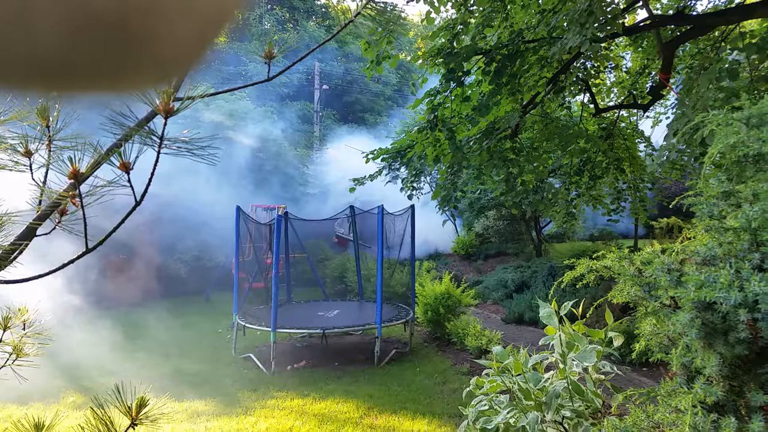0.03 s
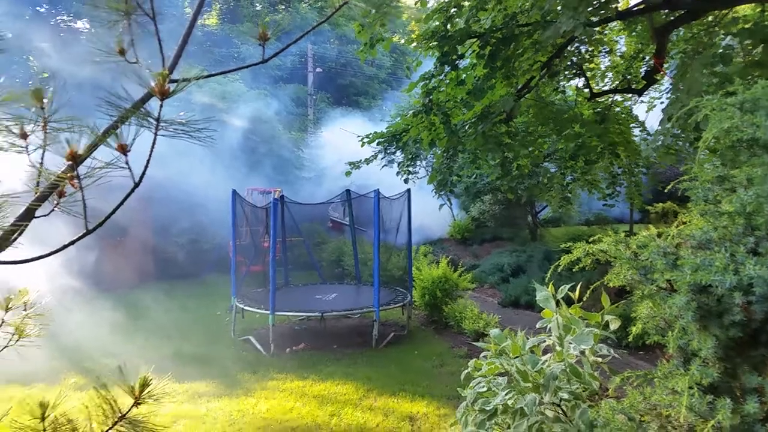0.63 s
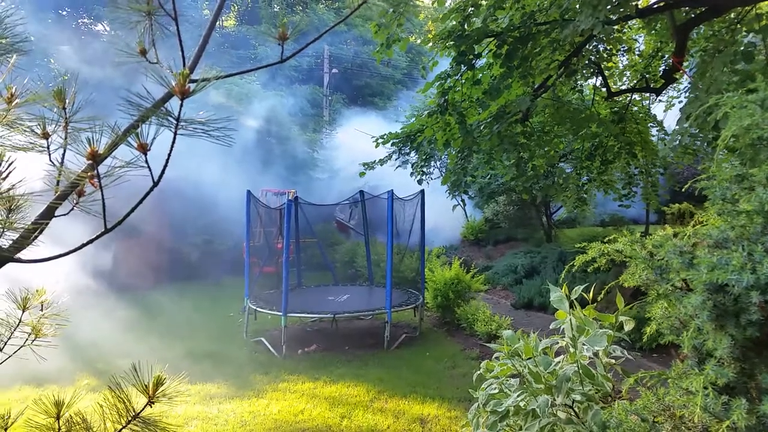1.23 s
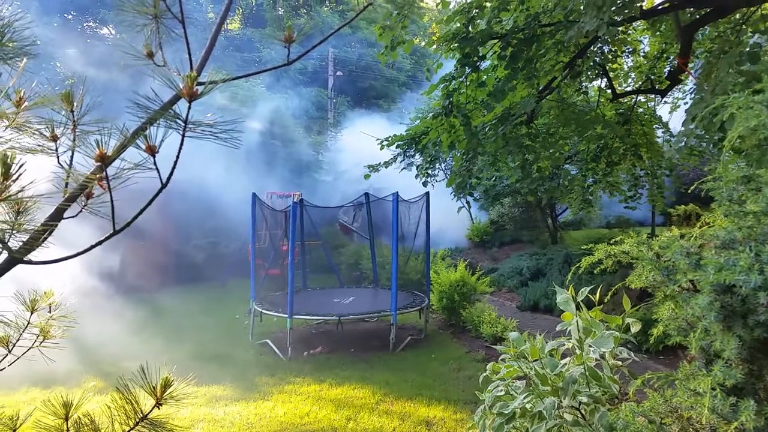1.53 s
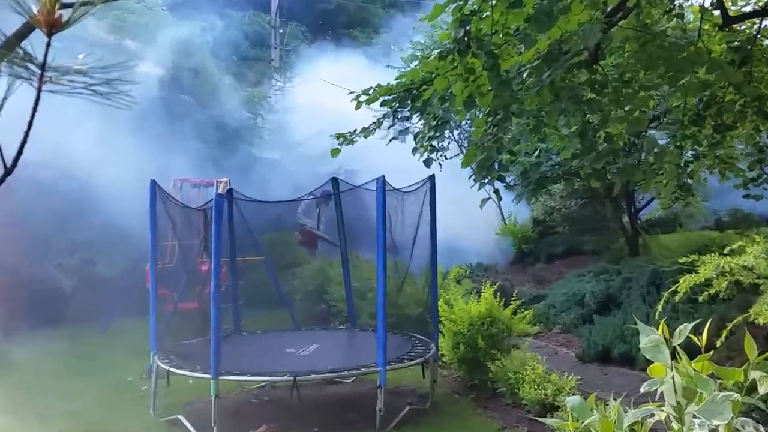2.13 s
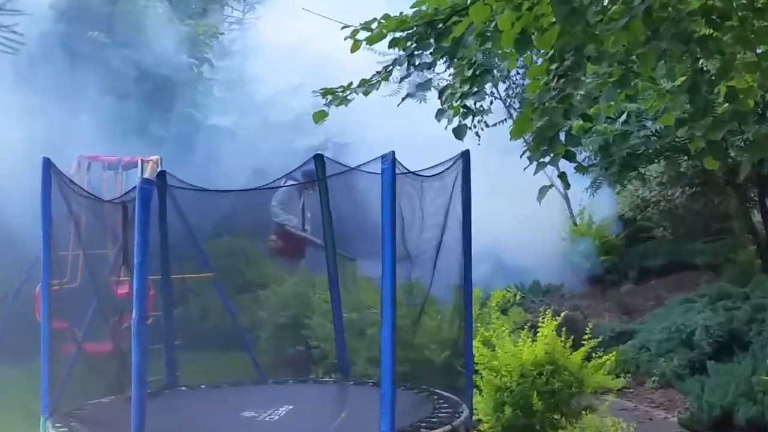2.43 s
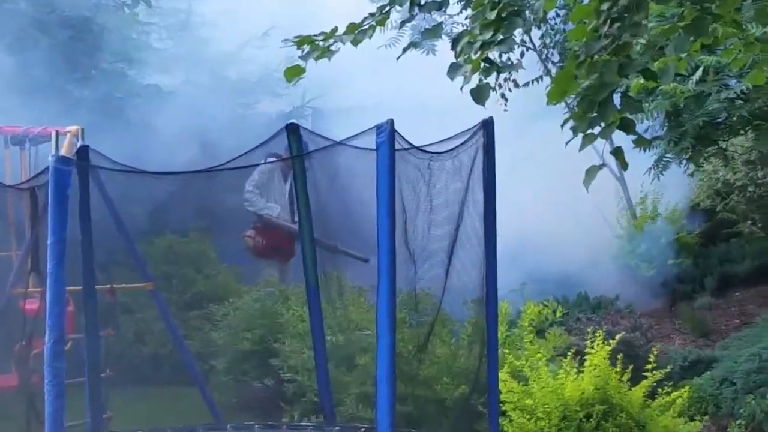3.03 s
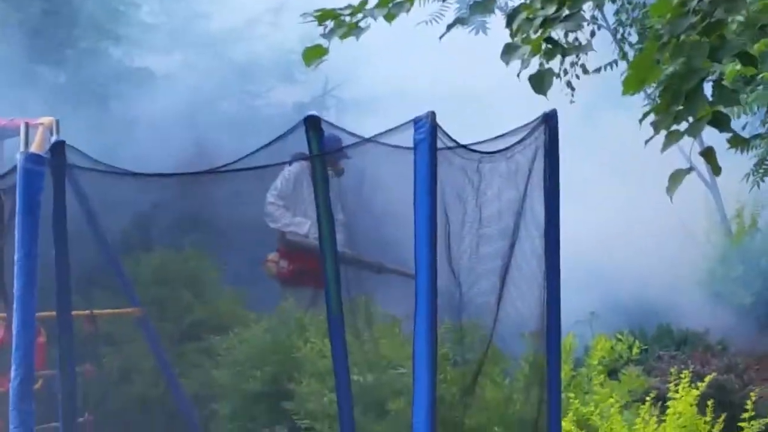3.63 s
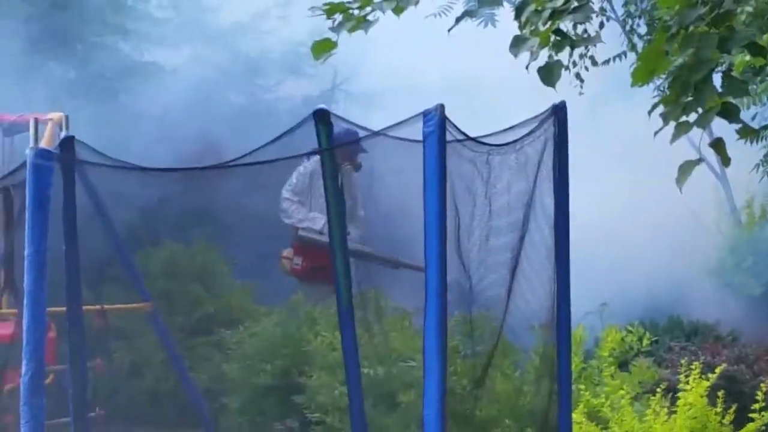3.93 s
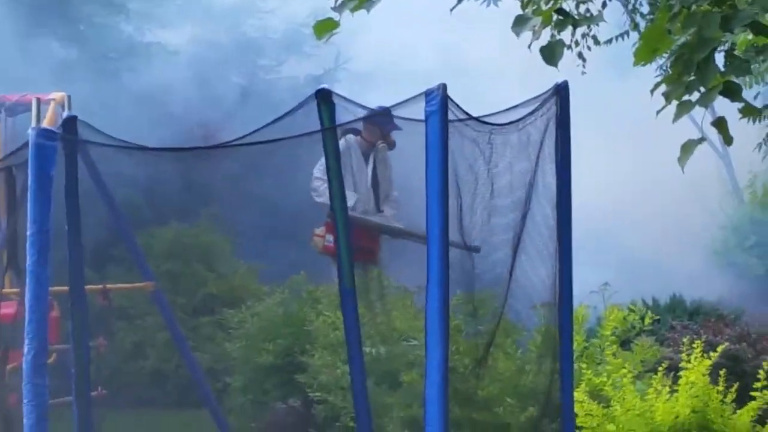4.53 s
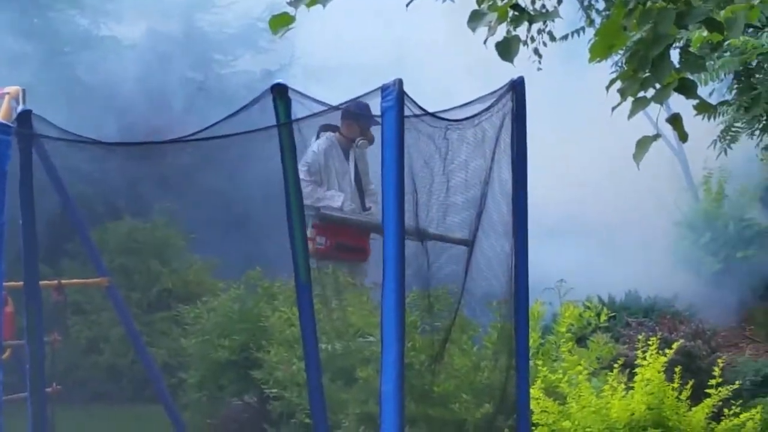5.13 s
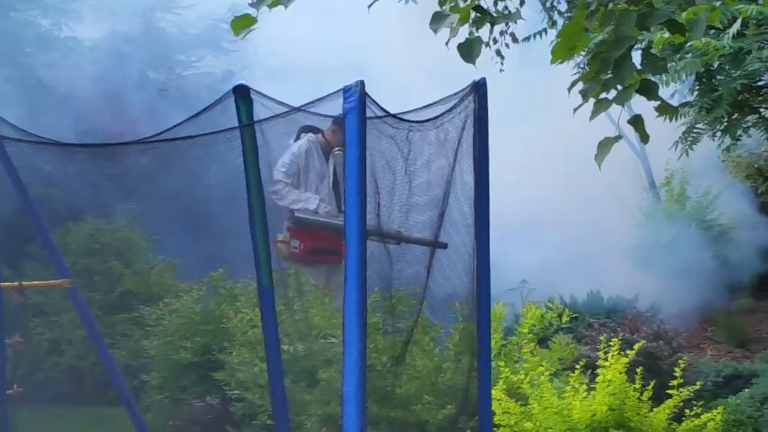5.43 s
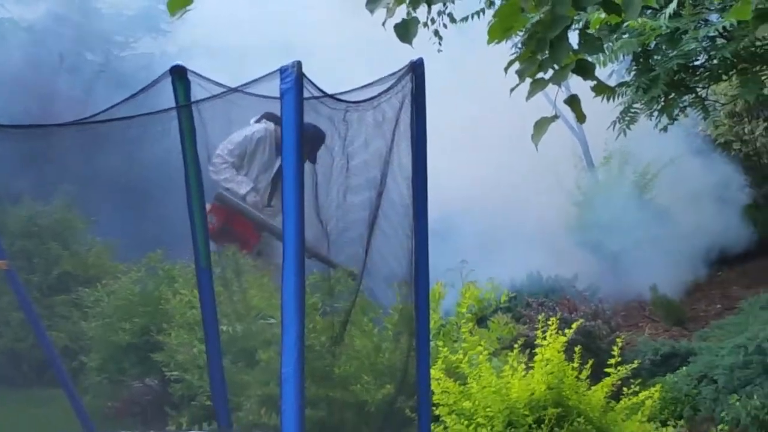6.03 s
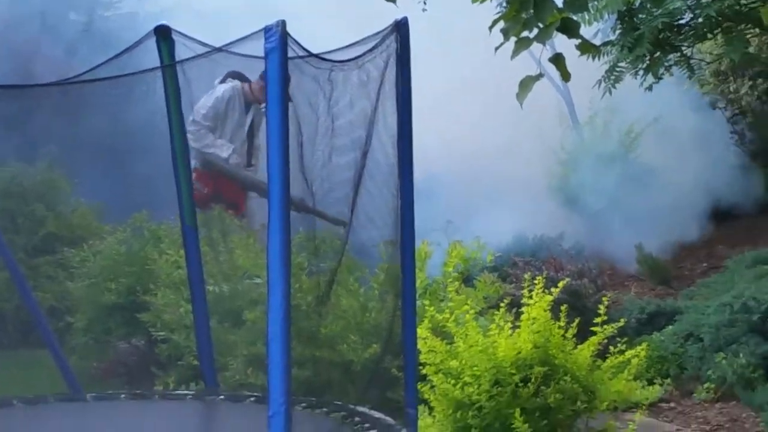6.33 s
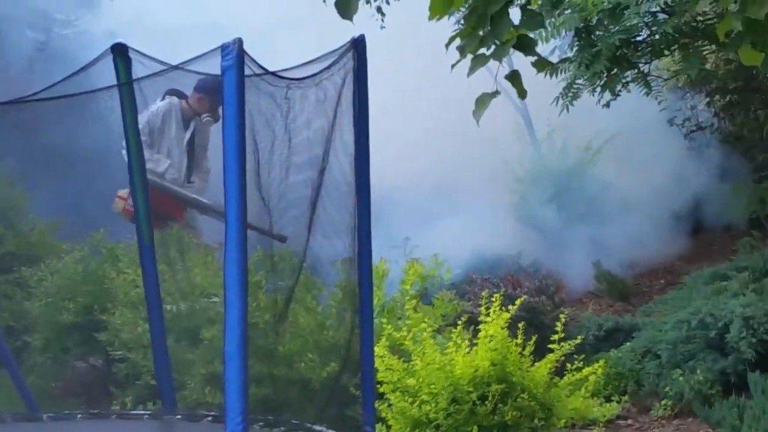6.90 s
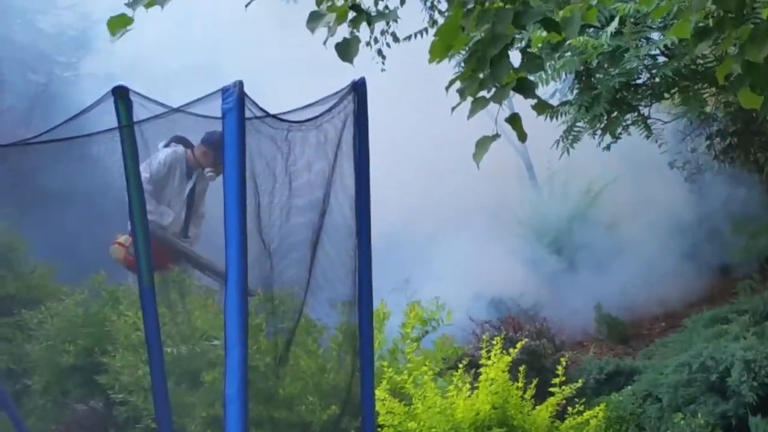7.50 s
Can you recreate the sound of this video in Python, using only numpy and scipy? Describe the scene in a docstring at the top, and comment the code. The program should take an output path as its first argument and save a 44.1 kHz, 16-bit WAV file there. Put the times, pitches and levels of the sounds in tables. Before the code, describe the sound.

Some way off in a garden, a fogger runs without a break, picked up by a stereo pair of microphones. After a quick fade in, a low buzzing hum, a rough exhaust rasp and a nozzle hiss sound together, gently swelling and sinking as the machine is turned. A few slight cracks and a soft thump interrupt the even firing, while lawn and foliage scatter the sound a little.

```python
"""Pulse-jet fogger in a garden

Some way off from a stereo pair of microphones, a fogger is carried slowly along the shrubs.
Its chamber fires about 111 times a second: a deep hum, a ragged bark from the long pipe and a hiss
from the nozzle. Lawn and foliage scatter the sound on its way. It fades in from silence, and the
flame stumbles with one soft thump and two much fainter ones."""
import sys
import numpy as np
from scipy import signal
from scipy.fft import rfft, irfft
from scipy.io import wavfile
from scipy.ndimage import uniform_filter1d

SR = 44100
rng = np.random.default_rng(int(sys.argv[2]) if len(sys.argv) > 2 else 0)


def unload_audio(sound):
    """Save the sound as a 16-bit wav file, at the path given as the first command line argument."""
    columns = np.transpose(np.atleast_2d(sound))
    # keep every value between -1 and 1, then stretch to whole-number steps
    steps = np.round(np.clip(columns, -1, 1) * 32767)
    wavfile.write(sys.argv[1], SR, steps.astype(np.int16))


N = 342216
TIME = np.arange(N) / SR
FREQS = np.fft.rfftfreq(4096, 1 / SR)

# the fundamental swells and sinks as the pipe moves over the ground: (time [s], level [dB])
HUM_LEVEL = [(0.68, -14), (0.72, -14), (2.0, -14.5), (2.45, -21), (2.81, -16.5), (4.01, -13.5),
             (5.53, -16.5), (5.77, -14), (6.2, -15), (6.38, -12), (6.73, -18), (6.81, -15), (7.54, -12),
             (7.76, -16)]
# the thin whistling edge of the jet: (time [s], pitch [Hz], lift [dB])
WHISTLE = [(.7, 6900, 5), (1.8, 6900, 5), (2.2, 6770, 4), (2.9, 6850, 3), (3.3, 6880, 1), (3.9, 6850, 6),
           (4.35, 7100, -2), (4.7, 6952, 0), (5.35, 6950, 8), (5.8, 6900, 2), (6.2, 6780, 7),
           (6.65, 6950, 8.5), (7.4, 6957, 1), (7.76, 6975, -4)]


def combustion(firing_hz=110.9, hunt_hz=.5, jitter_cycles=.026, uneven_db=0.44):
    """Cycles fired so far and each charge's strength: pipe length sets the rate; no two burn alike."""
    # the flame races or stumbles: (time [s], length [s], change of rate [Hz])
    surges = [(.77, 0.065, 3), (1.23, 0.17, 3), (1.92, 0.069, 2.5), (2.04, 0.097, -1.57),
              (2.15, 0.051, 2.5), (2.43, .15, 2.5), (2.65, 0.099, -1.4), (2.87, 0.081, 2),
              (3.05, 0.096, -2.5), (3.42, 0.096, 1.35), (4.17, 0.21, -1.5), (4.42, 0.073, 3),
              (4.7, .15, -2), (5.0, .15, 1.73), (5.19, 0.089, 5.5), (5.38, 0.075, -6.5), (5.77, 0.059, 3),
              (6.28, 0.078, 2.5), (6.53, 0.074, 1.98), (7.66, 0.068, 2.5)]
    rate = firing_hz + hunt_hz * wander(1.5, 4) + moments(surges)
    turns = np.cumsum(rate) / SR + jitter_cycles * wander(3, 15) + 1
    charge = gain_of(uneven_db * rng.standard_normal(N)[turns.astype(int)])
    return turns, charge


def hum(turns, left_lead_rad=.15):
    """The gas column swings in and out of the pipe: the firing rate, its octave and a faint twelfth."""
    # the fundamental drops out for a few cycles: (time [s], length [s], change [dB])
    dips = [(2.19, 0.043, -4.5), (5.387, 0.017, -13)]
    # the octave starts faint and comes up: (time [s], base level [dB])
    octave_level = [(0.5, -29), (0.8, -24), (1.08, -26), (1.28, -20.5), (1.45, -28.5), (1.7, -28),
                    (2.02, -22), (2.4, -23), (3.55, -18), (4.05, -21.5), (4.9, -19.2), (6.05, -21.5),
                    (6.5, -19.5), (7.3, -22), (7.7, -18)]
    first_db = follow(HUM_LEVEL)[0] + moments(dips) + 0.02 + 0.9 * wander(6.3, 15)
    first = gain_of(first_db) * np.exp(2j * np.pi * turns)
    octave_db = follow(octave_level)[0] + 0.44 * hum_sag()  # grows as the fundamental sinks
    # a quarter turn on the octave skews the pressure wave
    octave = gain_of(octave_db + 0.04 + 0.63 * wander(2, 14)) * 1j * np.exp(4j * np.pi * turns)
    twelfth = -gain_of(octave_db - 19) * np.exp(6j * np.pi * turns)
    wave = np.sqrt(2) * (first + octave + twelfth)
    return np.array([(wave * np.exp(1j * side * left_lead_rad / 2)).real for side in (1, -1)])


def hum_sag():
    """How far the fundamental lies below its usual level, in dB."""
    level, = follow(HUM_LEVEL)
    return np.median(level) - level


def bark(turns, charge, side_on, rasp_db=-26.5):
    """The blasts ring the pipe: a chug at the bottom, a bark in the middle, a rasp on top."""
    # the part that differs between the microphones: (frequency [Hz], gain [dB])
    scatter = [(100, -15), (300, -23), (500, -7), (850, -18), (1300, -8), (1650, -7.5), (1950, -7.5),
               (2400, -8), (3300, 0.5), (7000, 0)]
    # tilt across the pair: (frequency [Hz], left minus right [dB])
    balance = [(200, 0.7), (380, -0.5), (700, 2.5), (1290, 2.5), (2370, 0), (4380, -7), (8090, 0.3),
               (14900, -0.5)]
    # the chug, below the ground dip: (time [s], base level [dB])
    chug_level = [(.5, -32), (.8, -30), (1.4, -31), (2.15, -29), (2.5, -29.5), (2.85, -31.5), (3.1, -29.5),
                  (3.75, -33.5), (4.3, -31), (5.15, -31.5), (5.7, -29.5), (6.2, -29.5), (6.55, -32),
                  (6.95, -30.5), (7.2, -28.5), (7.42, -33), (7.76, -26)]
    # the bark above it: (time [s], base level [dB])
    bark_level = [(.5, -25), (.8, -23), (1.45, -23), (2.08, -25), (2.45, -25), (3.58, -24.5), (4.4, -25.5),
                  (4.93, -21.5), (5.2, -25), (5.5, -21.5), (6.2, -25.5), (6.9, -23.5), (7.3, -26),
                  (7.68, -26), (7.76, -23)]
    # both microphones share the direct sound; the scattered sound reaches them in opposite phase
    drives = garden(blast(turns, charge)), garden(colour(blast(turns, charge), spectrum(scatter)))
    shared, scattered = pipe_rings(np.array([pipe(drive, side_on) for drive in drives]))
    mics = np.array([colour(shared + side * scattered, side * spectrum(balance) / 2)
                     for side in (1, -1)])
    bottom, body = below(mics, 505), below(mics, 1080)
    chug = bottom * gain_of(follow(chug_level)[0] + 0.13) / band_rms(shared, 280, 500)
    middle_db = follow(bark_level)[0] - 1 + 0.04 * wander(3.7, 25)
    middle = (body - bottom) * gain_of(middle_db) / band_rms(shared, 560, 1100)
    rasp = (mics - body) * gain_of(rasp_db - 1.5 * side_on) / band_rms(shared, 1100, 2600)
    return chug + middle + rasp


def blast(turns, charge, roar_hz=600, rasp_hz=1950, rasp_lead_cycles=0.1984):
    """Each firing gives a turbulent puff and a steep shock front; its rasp leaves a little early."""
    def firing(cycles, shock):
        puff = evened(0.53 + burst(cycles, .36, 0.24)) * rng.standard_normal(N)
        front = shocks(cycles + .006 * wander(5.2, 40), start=.38)
        return charge * (puff + shock * front)

    sharp = crossover(firing(turns, shock=0.82), firing(turns + rasp_lead_cycles, shock=0.37), rasp_hz)
    # the large eddies outlast a cycle, so the low end is an even roar
    eddies = 1.5 * rng.standard_normal(N)
    return evened(ground_bounce(crossover(eddies, sharp, roar_hz)))


def pipe(drive, side_on):
    """The resonant pipe, whose colour changes as it turns side on to the microphones."""
    # overall colour of the bark: (frequency [Hz], gain [dB])
    outline = [(30, -45), (70, -38), (110, 4.5), (160, 1.5), (260, 2.5), (320, -4), (600, -4), (880, -3),
               (1300, -9), (1900, -14), (2500, -13), (3100, -24), (5000, -37.5), (9000, -60)]
    # peaks of the pipe and the dip from the ground bounce: (frequency [Hz], width [Hz], gain [dB])
    peaks = [(414, 66, 4.5), (505.2, 70, -15.5), (550, 36, 1.5), (596, 54, -3.5), (695, 69, 2),
             (780, 64, -1.4), (920, 140, 1), (953, 50, 2), (1055, 84, -4.5), (1166, 69, 5),
             (1288, 65, -4.5), (1424, 91, 8.5), (1615, 116, 5), (1774, 77, 3), (1963, 110, -5.5),
             (2340, 210, 5), (2517, 140, 3), (2560, 90, 0)]
    # what swinging side on adds: (frequency [Hz], width [Hz], gain [dB])
    swung = [(756, 180, 3.5), (1190, 140, -2), (1635, 200, -2), (1904, 120, 5), (2055, 220, 6),
             (2510, 160, -2), (2960, 570, 7)]
    away_db = spectrum(outline) + bumps(peaks)
    return (1 - side_on) * colour(drive, away_db) + side_on * colour(drive, away_db + bumps(swung))


def pipe_rings(x):
    """Three resonances of the pipe drift and swell as it is carried."""
    # each ring, the lowest near the sixth harmonic: (time [s], pitch [Hz], lift [dB])
    lower_ring = [(.6, 672, 5.5), (1.3, 665, -2), (2.1, 670, -2), (2.45, 666, 9), (2.9, 694, 5.5),
                  (3.4, 690, 6), (3.9, 683.6, 4), (4.6, 668.8, -1.5), (5.3, 685, 7), (5.8, 650, -5.5),
                  (6.3, 654, 2.5), (6.8, 675, 1.5), (7.76, 668, -1.5)]
    main_ring = [(.6, 905, 3), (1.3, 895, 4), (1.9, 870, 4), (2.4, 910, 4), (2.9, 835, 4), (3.7, 830, 3.5),
                 (4.1, 930, 6.5), (4.9, 910, 5.5), (5.4, 854.5, -0.5), (5.75, 930, 4), (6.199, 879.5, 0.5),
                 (7.1, 900, 2.5), (7.76, 910, 3)]
    upper_ring = [(.7, 1630, -2.5), (1.25, 1645, 6), (1.6, 1610, 2.5), (2.05, 1640, 6.5), (2.5, 1620, 5),
                  (3.2, 1610, 6.5), (3.55, 1638, 0.5), (4.5, 1615, 5), (5.2, 1675, 0.5), (6.1, 1650, 6.5),
                  (6.7, 1630, 2), (7.25, 1640, 8), (7.76, 1640, 4)]
    x = ringing(x, lower_ring, width_hz=20, waver_hz=5.2)
    x = ringing(x, main_ring, width_hz=91, waver_hz=12)
    return ringing(x, upper_ring, width_hz=86, waver_hz=10)


def cracks(x):
    """A rich charge goes off harder than the rest and cracks in the pipe's middle range."""
    # hard firings: (time [s], length [s], lift [dB])
    pops = [(1.568, .016, 4), (2.098, .018, 3), (2.391, .018, 4), (3.045, 0.012, 5), (3.295, 0.044, 4),
            (5.9, 0.014, 9.5), (6.941, 0.016, 4.5), (7.131, .016, 4.5), (7.297, .016, 2)]
    return x + (gain_of(moments(pops)) - 1) * band(x, hz=1500, width_hz=800)


def nozzle(turns, charge, swing, view, base_db=-36.5):
    """The jet hisses in time with the firing; with the mouth in view, each cycle opens with a spit."""
    # the hiss facing away, and side on: (frequency [Hz], gain [dB])
    hiss_away = [(1200, -23), (2500, -9), (3300, 2), (4400, 0.8), (4800, -0.5), (5200, 0.3), (6000, 1.5),
                 (6900, -0.5), (7400, -1), (8600, 0.6), (10000, -2.5), (12400, -1.5), (14500, -5.5)]
    hiss_side = [(1200, -19), (2500, -7.5), (3400, 2.5), (4200, -2), (4950, -5.5), (5700, -1.5),
                 (6900, 2.6), (7800, 2.6), (8600, -1.5), (9500, -0.5), (10900, -6.3), (12500, -4.5),
                 (14500, -6)]
    # colour of the spit: (frequency [Hz], gain [dB])
    spit_colour = [(1200, -29), (2100, 8), (2800, 7.5), (3300, 0.5), (3900, -14), (5300, -21), (6000, -5),
                   (6400, -1), (6950, -2), (7300, 2), (7800, 1), (9500, -9), (11000, -20), (14500, -15)]
    # the hiss surges or slackens: (time [s], length [s], change [dB])
    surges = [(.5, 0.22, -0.5), (2.15, 0.11, 1), (3.34, .08, 1.5), (3.72, 0.045, 2), (4.48, .06, -0.5),
              (5.24, .06, 0.5), (5.5, 0.12, -0.5), (6.9, .15, 0.5), (7.4, 0.55, 0.5)]
    jets = (3.2 + burst(turns, .2, 0.55)) * rng.standard_normal((2, N))
    hiss = [(1 - swing) * colour(jet, spectrum(hiss_away)) + swing * colour(jet, spectrum(hiss_side))
            for jet in jets]
    hiss = np.array([leaves(mic) for mic in hiss])
    hiss *= gain_of(2) / band_rms(hiss[0], 4000, 14000)
    spit = colour(charge * burst(turns, .15, 0.077) * rng.standard_normal(N), spectrum(spit_colour))
    spit *= gain_of(-6) / band_rms(spit, 4000, 14000)
    whistling = ringing(hiss + view * spit, WHISTLE, width_hz=110, waver_hz=30)
    # louder with the mouth in view and where the hum is weak
    level_db = base_db + 0.9 * view + 0.29 * hum_sag() + moments(surges)
    return gain_of(level_db + 0.38 * wander(4, 25)) * whistling


def sputter(turns, charge):
    """A short puff early in each cycle rings the mouth of the nozzle."""
    # narrow rings of the mouth: (frequency [Hz], gain [dB])
    mouth = [(4500, -28), (4850, -5), (5080, 4), (5350, -4), (5850, 0), (6300, -2), (6800, 2), (7200, -12),
             (8800, -11), (11000, -28)]
    # heard mostly before the machine swings side on: (time [s], level [dB])
    level = [(.9, -62), (1.1, -50), (1.6, -57), (2.1, -44), (2.85, -42.5), (3.5, -45), (3.95, -60),
             (5.9, -62), (6.6, -52), (7.76, -60)]
    puffs = charge * burst(turns, .08, .16) * rng.standard_normal(N)
    rung = ringing(colour(puffs, spectrum(mouth)), WHISTLE, width_hz=150, waver_hz=30)
    return gain_of(follow(level)[0]) * evened(rung)


def flares(x):
    """One band of the exhaust after another stands out or sinks as the machine is turned."""
    # passing bands: (time [s], length [s], pitch [Hz], width [Hz], gain [dB])
    bands = [(.7, 0.67, 5000, 800, -5), (.86, .28, 3900, 1200, 4), (.82, 0.29, 2400, 350, 5),
             (1.1, .22, 5900, 800, 3.8), (1.15, 0.35, 7900, 900, 3.5), (1.25, 0.36, 3000, 600, -3),
             (1.65, 0.42, 13000, 900, 1), (2, 0.5, 1900, 140, 4), (2.4, 0.77, 2000, 220, 2),
             (2.3, 1, 3200, 300, 2.5), (2.45, .6, 12000, 2500, 2.5), (2.6, 1.2, 5100, 150, 1.5),
             (2.7, 0.75, 425, 110, -4.5), (2.8, 1.2, 566, 45, 6), (2.95, .3, 6780, 200, 2.5),
             (6.7, .45, 6600, 220, 2.5), (2.7, 0.69, 2700, 200, 2), (2.7, 0.49, 1400, 110, 0.5),
             (3.25, 0.69, 1710, 150, -9), (3.3, .7, 7500, 1200, -1.5), (3.3, 1.4, 800, 80, 0.5),
             (3.92, 0.16, 8200, 600, 4.5), (3.92, 0.21, 12600, 1400, 2.5), (4.3, 0.4, 1200, 90, -5),
             (4.38, .15, 7300, 1200, 2.5), (5.4, .5, 770, 90, 2.5), (5.6, .18, 7856, 800, 4.5),
             (4.4, 0.44, 1430, 110, -0.5), (7.2, 0.41, 1420, 110, 1), (5.37, .5, 2320, 160, 2),
             (5.7, .6, 3020, 300, 1), (6.14, 0.74, 440, 120, 1), (5.9, 0.44, 2750, 500, 0),
             (6.05, 0.33, 1890, 250, 3), (6.45, .35, 2430, 450, -3.5), (6.65, 0.56, 3000, 250, 4.5),
             (6.4, .2, 9000, 590, 6), (6.55, 0.33, 7600, 900, 2.2), (7.72, .25, 2800, 400, 4.5),
             (7.742, 0.23, 7900, 800, 5)]
    return x + sum((gain_of(db * swell(at, length)) - 1) * band(x, hz, width)
                   for at, length, hz, width, db in bands)


def thumps():
    """The flame stumbles: each time, one heavily damped low swing."""
    # soft thumps: (time [s], pitch [Hz], decay [s], envelope peak [dB])
    stumbles = [(.716, 50, 0.0034, -28), (3.405, 49.95, .004, -36), (5.381, 50, 0.003, -17)]
    out = np.zeros(N)
    for at, hz, decay, db in stumbles:
        age = np.maximum(TIME - at, 0)
        envelope = age / decay * np.exp(1 - age / decay)
        out -= gain_of(db) * envelope * np.sin(2 * np.pi * hz * age)
    return out


def ground_bounce(x, strength=0.13, delay_s=.006, drift_s=0.00031):
    """A weak echo off the lawn; its path changes as the machine is carried, so the colour phases."""
    return x + strength * delayed(x, delay_s + drift_s * wander(0.19, 0.64))


def leaves(x, strength=0.27, drift_s=.00004):
    """Four glancing echoes whose paths keep changing, so narrow bands of the hiss come and go."""
    delays_s = (.002 * rng.uniform(0.394, 1.6) + drift_s * wander(.3, 1.7) for _ in range(4))
    return x + strength * sum(delayed(x, late) for late in delays_s)


def garden(x, smear_s=.004, tail=0.32, t60_s=0.18, size=8192, places=4):
    """Foliage delays each pitch differently; the trees add a short tail that changes along the walk."""
    paths = uniform_filter1d(uniform_filter1d(rng.standard_normal(size // 2 + 1), 40), 40)
    delay = smear_s * evened(paths) ** 2
    smear = irfft(np.exp(-2j * np.pi * np.cumsum(delay) * SR / size))
    out = signal.oaconvolve(x, smear)[:N]
    t = np.arange(size) / SR
    walk = TIME / TIME[-1] * (places - 1)
    for place in range(places):
        near = np.cos(np.pi / 2 * np.clip(walk - place, -1, 1))
        echoes = gain_of(-60 * t / t60_s) * rng.standard_normal(size) * (t > .012)
        out += tail * signal.oaconvolve(x * near, echoes / np.linalg.norm(echoes))[:N]
    return out


def air_rumble(level_db=-64):
    """A faint rumble of air, different at each microphone."""
    return gain_of(level_db) * np.array([wander(12, 60), wander(12, 60)])


def burst(turns, start, length):
    """An envelope that jumps once a cycle and dies away; start and length are shares of the cycle."""
    return evened(np.exp(-((turns - start) % 1) / length))


def shocks(turns, start):
    """One pressure spike each cycle."""
    return evened(np.diff(np.floor(turns - start), prepend=np.floor(turns[0] - start)))


def ringing(x, table, width_hz, waver_hz):
    """Lifts or cuts one moving resonance: its pitch is shifted to zero, smoothed and shifted back."""
    hz, db = follow(table)
    carrier = np.exp(2j * np.pi * np.cumsum(hz + waver_hz * wander(1.7, 6.8)) / SR)
    pole = np.exp(-np.pi * width_hz / SR)
    ring = 2 * (carrier * signal.lfilter([1 - pole], [1, -pole], x / carrier)).real
    return x + (gain_of(db) - 1) * ring


def colour(x, db):
    """A causal filter with the given gain in dB."""
    log_gain = np.log(gain_of(np.r_[db, db[-2:0:-1]]))
    taps = np.fft.ifft(np.exp(np.conj(signal.hilbert(log_gain)))).real
    return signal.oaconvolve(x, taps[:len(db)])[:N]


def spectrum(points):
    """Gains in dB, joined on a log-frequency axis."""
    hz, db = np.transpose(points)
    return np.interp(np.log(FREQS + 1), np.log(hz), db)


def bumps(rows):
    """Bell-shaped peaks and dips, in dB."""
    return sum(db * .5 ** ((2 * (FREQS - hz) / width) ** 2) for hz, width, db in rows)


def band(x, hz, width_hz):
    """The part of a sound around a frequency."""
    return signal.lfilter(*signal.iirpeak(hz, hz / width_hz, SR), x)


def below(x, hz):
    """The part of a sound under a frequency."""
    return signal.sosfiltfilt(signal.butter(4, hz, fs=SR, output="sos"), x)


def crossover(low, high, hz):
    """One sound below a frequency joined to another above it."""
    return sum(signal.sosfilt(signal.butter(4, hz, kind, fs=SR, output="sos"), x)
               for kind, x in (("low", low), ("high", high)))


def delayed(x, delay_s):
    """A sound arriving late by a changing time."""
    return np.interp(TIME - delay_s, TIME, x)


def wander(lo_hz, hi_hz, size=4096):
    """Random drift between two rates."""
    hz = np.fft.rfftfreq(size, N / SR / size)
    shape = hz ** 2 / (hz ** 2 + lo_hz ** 2) / np.sqrt(1 + (hz / hi_hz) ** 4)
    drift = evened(irfft(rfft(rng.standard_normal(size)) * shape))
    return np.interp(TIME, np.linspace(0, TIME[-1], size), drift)


def follow(rows):
    """The columns of a curve table at every sample."""
    times, *columns = np.transpose(rows)
    return [np.interp(TIME, times, column) for column in columns]


def swell(at, length):
    """A smooth rise and fall round one moment."""
    return np.exp2(-np.minimum((2 * (TIME - at) / length) ** 2, 20))


def moments(rows):
    """The sum of brief swells."""
    return sum(height * swell(at, length) for at, length, height in rows)


def band_rms(x, lo_hz, hi_hz):
    """The rms level inside one band."""
    hz = np.fft.rfftfreq(N, 1 / SR)
    return np.sqrt(2 * np.sum(abs(rfft(x)[(hz > lo_hz) & (hz < hi_hz)]) ** 2)) / N


def evened(x):
    """Scales to an rms of one."""
    return x / np.sqrt(np.mean(x ** 2) + 1e-20)


def gain_of(db):
    """Decibels to gain."""
    return 10 ** (np.asarray(db) / 20)


def scene():
    """The fogger some way off in the garden, over a faint rumble of air."""
    # how it is held: (time [s], swing [0 facing away, 1 side on], pipe mouth [0 hidden, 1 in view])
    aim = [(0.4, 0.16, 0.075), (1.8, 0.027, 0.071), (2.3, 0.062, 0.15), (2.85, 0.079, 0.45),
           (3.3, 0.12, 0.15), (3.6, 0.47, 0.2), (3.95, 0.85, 0.82), (4.3, 0.83, 0.83), (4.8, 1, 0.63),
           (5.45, 1, 1), (5.95, 0.9, 0.54), (6.5, 0.8, 0.87), (6.9, 0.68, 0.89), (7.3, 0.93, 0.34),
           (7.76, 1, 0.94)]
    # it drifts a little to the left: (time [s], left minus right [dB])
    pan = [(.4, .1), (4.7, .1), (5.3, .55), (7.76, .55)]
    turns, charge = combustion()
    swing, view = np.clip(follow(aim), 0, 1)
    exhaust = cracks(bark(turns, charge, side_on=(swing + view) / 2))
    jet = nozzle(turns, charge, swing, view) + sputter(turns, charge)
    fogger = hum(turns) + flares(exhaust + jet) + thumps()
    return fogger * gain_of(np.outer([.5, -.5], follow(pan)[0])) + air_rumble()


def record(dry, start_s=.38, fade_s=0.28, top_hz=14550):
    """Both microphones fade in from silence, and the highest treble is cut."""
    fade = np.clip((TIME - start_s) / fade_s, 0, 1) ** 0.87
    low_pass = signal.firwin(701, top_hz, window=("kaiser", 9), fs=SR)
    return signal.oaconvolve(dry * fade, low_pass[None], "same")


dry = scene()
out = record(dry)
unload_audio(out)
```